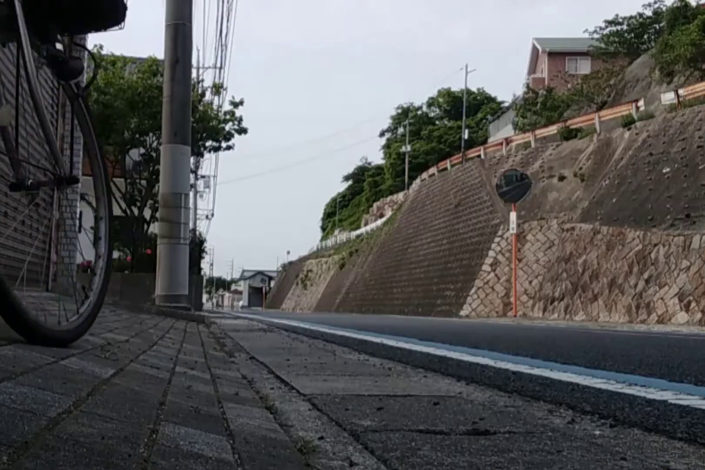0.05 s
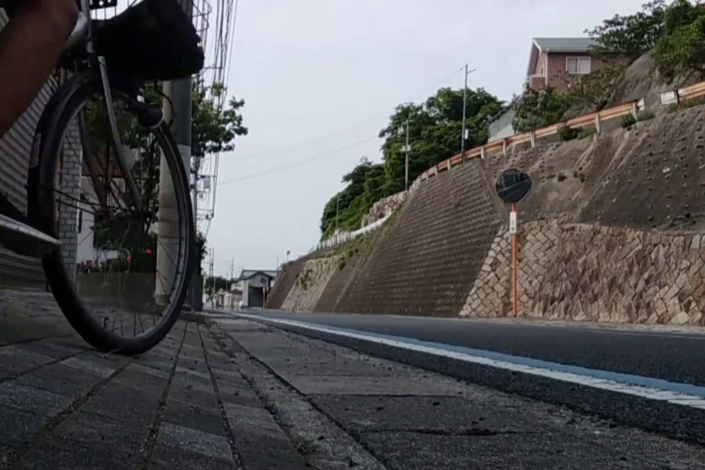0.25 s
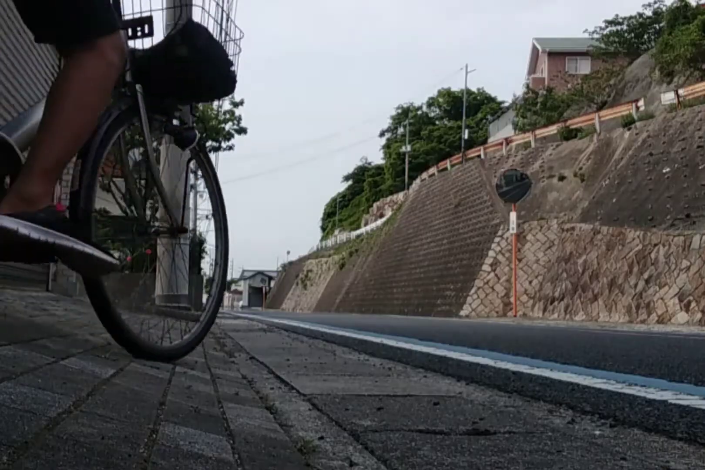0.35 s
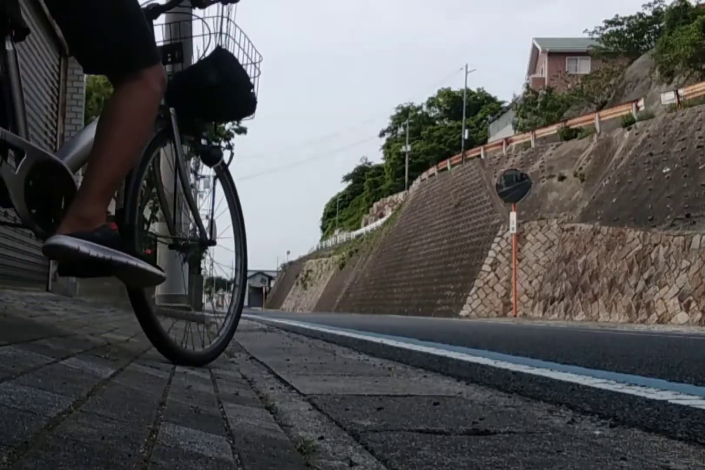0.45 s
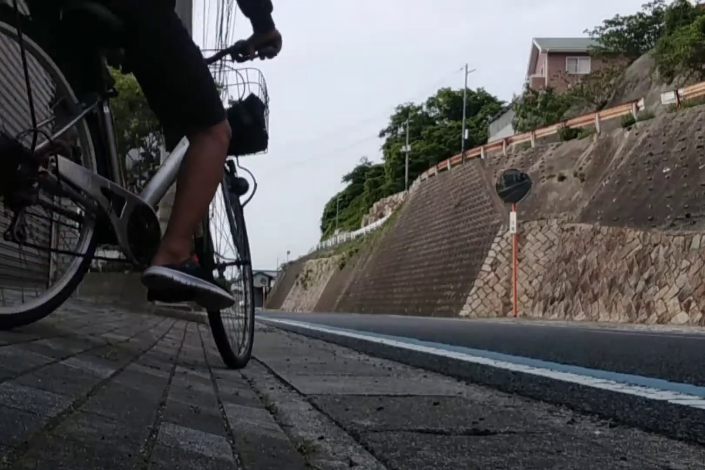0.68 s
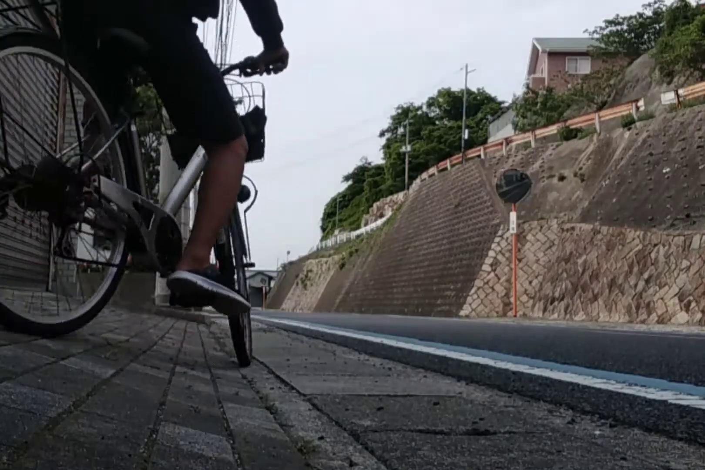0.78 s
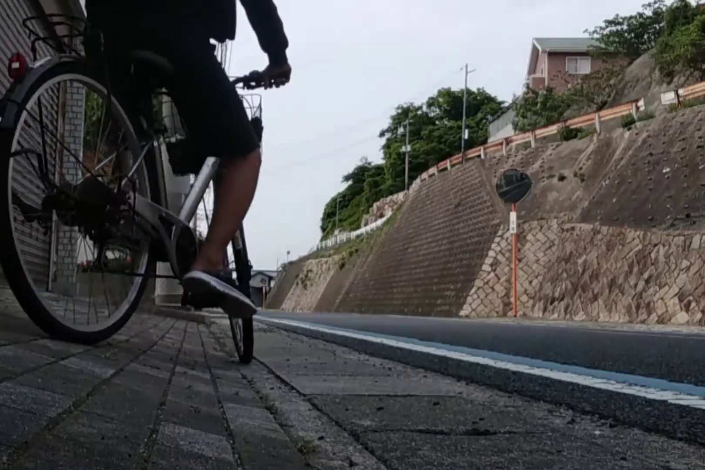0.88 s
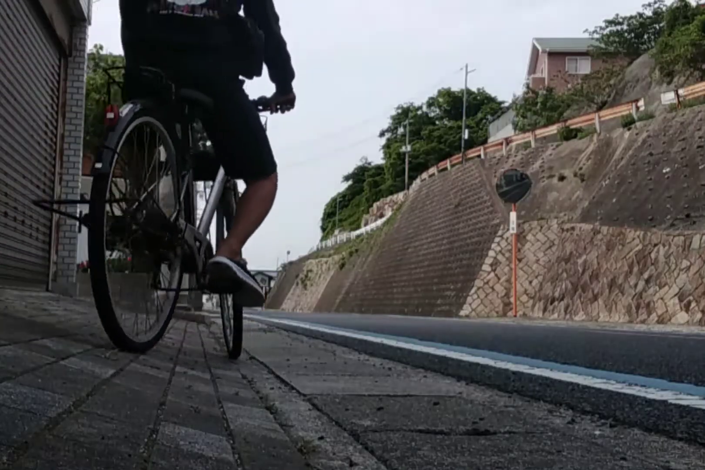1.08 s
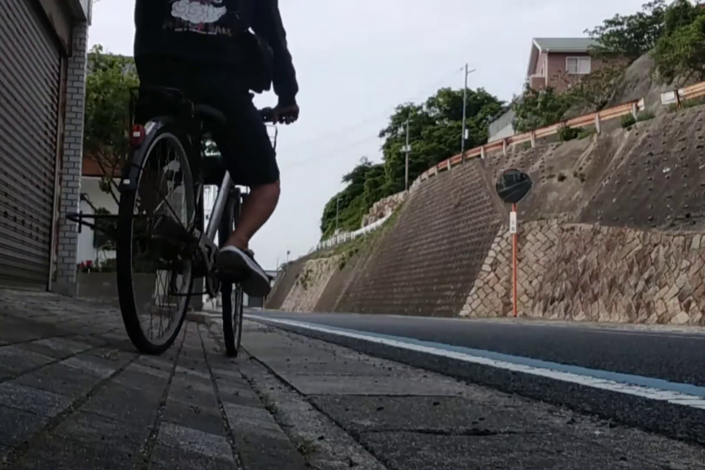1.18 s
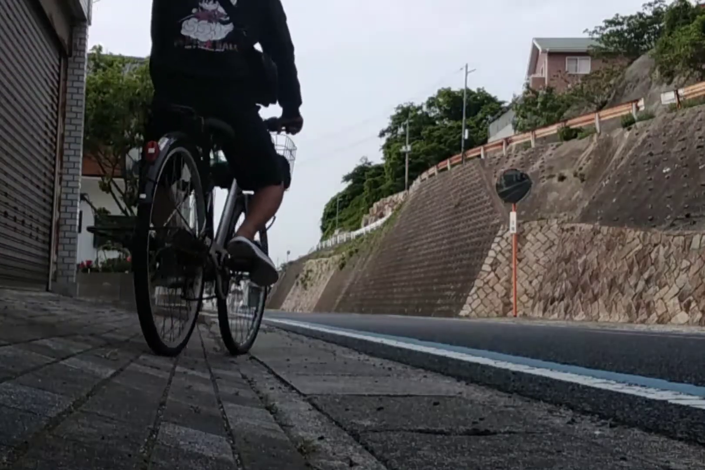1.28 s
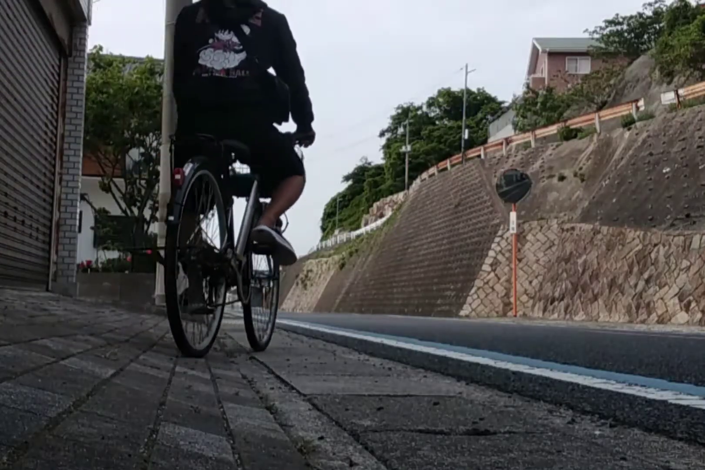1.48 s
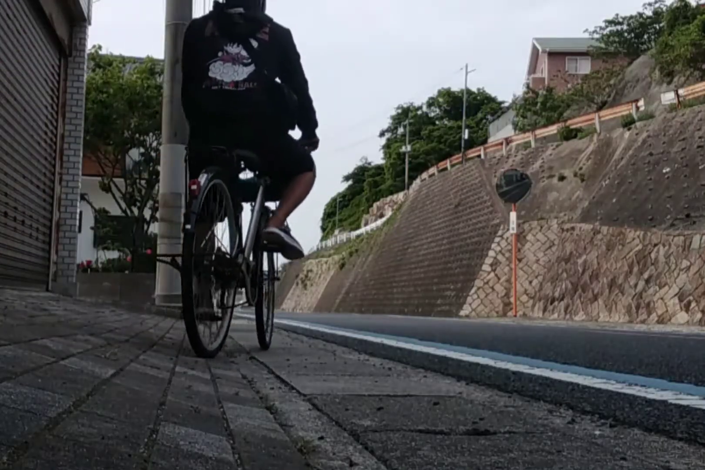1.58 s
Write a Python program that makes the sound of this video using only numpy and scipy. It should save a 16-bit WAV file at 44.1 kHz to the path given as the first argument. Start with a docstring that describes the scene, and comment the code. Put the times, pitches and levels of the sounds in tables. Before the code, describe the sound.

A bicycle rolls past a low microphone at a paved roadside. Its tyres hum and thump over joints while the freewheel ticks. It squeaks twice, then rattles once as it rides away over faint, distant traffic rumble.

```python
"""A paved roadside, heard from low down: a bicycle rolls past and rides away.
Its tyres hum on the grainy paving, thump over joints and snap grit. The freewheel pawl ticks,
a rubbing part squeaks twice, and loose metal rattles once further off.
Walls ahead return a faint tail. Distant traffic and air rumble underneath."""
import sys
import numpy as np
from scipy import signal
from scipy.fft import rfft, irfft
from scipy.io import wavfile
from scipy.ndimage import map_coordinates

SR = 44100
rng = np.random.default_rng(int(sys.argv[2]) if len(sys.argv) > 2 else 0)


def unload_audio(sound):
    """Save the sound as a 16-bit wav file, at the path given as the first command line argument."""
    columns = np.transpose(np.atleast_2d(sound))
    # keep every value between -1 and 1, then stretch to whole-number steps
    steps = np.round(np.clip(columns, -1, 1) * 32767)
    wavfile.write(sys.argv[1], SR, steps.astype(np.int16))


N = 72765
T = np.arange(N) / SR

# Tyre level as the wheels pass. Each row: time in seconds, level in dB.
TYRE_LEVEL = [(0, -39), (.205, -45), (.23, -33), (.34, -33), (.44, -38), (.55, -34), (.66, -31.5),
              (.81, -35), (1.03, -38), (1.2, -39), (1.34, -39), (1.45, -43.5), (1.65, -50.5)]
# Tyre treble, duller from behind. Each row: time in seconds, gain in dB.
TYRE_TREBLE = [(.2, 0.5), (.75, 1.5), (1.15, -4.5), (1.65, -4.5)]
# Tyre hum and grit scrape. Each row: frequency in Hz, relative density in dB.
TYRE_SPECTRUM = [(40, -32), (110, -17), (170, -8.5), (290, -16), (420, -8), (530, -5), (612, 1.5),
                 (690, -4), (790, -9), (1120, -8.5), (1400, -13), (1750, -27.5), (2600, -35), (5000, -48.5),
                 (9000, -44.5), (16000, -57)]
SCRAPE_SPECTRUM = [(1000, -24), (2000, -0.5), (3300, -4.5), (5000, -11.5), (12000, -35.5)]
# Paving joints. Each row: start in seconds, level in dB, T60 in seconds, relative crunch in dB.
JOINT_HITS = [(0.207, -29.5, 0.038, -6), (0.225, -24, 0.059, -9.5), (0.255, -23, 0.031, -27),
              (0.282, -26, 0.07, -22.5), (0.753, -23, 0.051, -30)]
# Wheel thump and grit crunch. Each row: frequency in Hz, relative density in dB.
THUMP_SPECTRUM = [(60, -36), (170, -27), (300, -8), (450, -4.5), (570, 9.5), (800, -8), (1250, -5),
                  (1600, -20), (2800, -31.5), (5000, -50), (16000, -56)]
CRUNCH_SPECTRUM = [(600, -13), (1000, 7.5), (1350, 10), (1700, -5), (3000, -11.5), (4500, -24.5),
                   (16000, -34)]
# Pawl drops. Each row: start in seconds, relative level in dB, T60 in seconds.
PAWL_DROPS = [(.1005, -37.5, 0.019), (0.1177, -41, .015), (0.166, -32.5, 0.015), (0.2262, -33, 0.017),
              (.283, -32, .016), (.3413, -33, 0.019), (0.4044, -34.5, 0.027), (0.469, -36.5, 0.033),
              (.534, -34, 0.015), (.6032, -32.5, 0.014), (.687, -36, 0.023), (.771, -37.5, .022),
              (1.349, -38, .016)]
# Pawl click. Each row: frequency in Hz, relative density in dB.
PAWL_SPECTRUM = [(800, -12), (2300, -6), (2900, 6), (3500, -7), (4300, 4.5), (5200, -3.5), (6600, 6.5),
                 (8500, -2), (12000, -3.5), (16000, 2)]
# Touches of the rubbing part. Each row: centre in seconds, half length in seconds, level in dB.
SQUEAK_TOUCHES = [(0.43, 0.012, -54), (.477, 0.0076, -36.5), (.502, 0.0085, -23), (0.516, 0.016, -36),
                  (0.56, 0.0044, -42), (0.8435, 0.012, -17.5), (0.8664, 0.015, -16)]
# Squeak pitch, dropping as the bicycle passes. Each row: time in seconds, pitch in Hz.
SQUEAK_PITCH_HZ = [(.43, 8880), (.5, 8925), (.57, 8940), (.83, 8745), (.86, 8708), (.9, 8700)]
# Loose metal knocks. Each row: start in seconds, level in dB, relative crack in dB.
METAL_KNOCKS = [(1.2444, -49, 3.5), (1.254, -40, -8), (1.269, -37, -7), (1.2764, -33.5, -4.5),
                (1.2794, -42, 0), (1.3105, -28, -12), (1.3152, -26.5, -13.5), (1.3277, -30.5, -12)]
# Thin metal modes. Each row: frequency in Hz, relative level in dB, T60 in seconds.
METAL_MODES = [(1400, -4, 0.029), (1667, -8.5, 0.03), (1895, 0, 0.023), (2013, 1.5, 0.038),
               (2270, -1, 0.027), (3140, -2.5, 0.024), (3490, -9.5, 0.032)]
# Crack of a knock. Each row: frequency in Hz, relative density in dB.
CRACK_SPECTRUM = [(700, -15), (1500, 0), (3700, 8), (5200, 5), (6500, -9), (16000, -20)]
# Short noise swells. Each row: centre in seconds, half length in seconds, level in dB.
NOISE_SWELLS = [(0.869, 0.0092, -47.5), (1.187, 0.013, -54)]
# Swell noise. Each row: frequency in Hz, relative density in dB.
SWELL_SPECTRUM = [(1200, -10), (2000, 4), (4000, 1), (7000, -2.5), (9000, -11.5), (16000, -26)]
# Chain and grit hiss. Each row: time in seconds, level in dB.
HISS_LEVEL = [(0, -56), (.11, -50), (.19, -49.5), (.25, -51.5), (.45, -49), (.7, -62), (1, -61.5),
              (1.22, -55.5), (1.33, -43.5), (1.4, -55.5), (1.65, -60.5)]
# Hiss and grit snaps. Each row: frequency in Hz, relative density in dB.
HISS_SPECTRUM = [(250, -7), (1100, 15), (2000, 10.5), (3500, 2), (5000, -2), (6500, -2), (9000, -4),
                 (16000, -26)]
# Distant traffic and air. Each row: frequency in Hz, relative density in dB.
RUMBLE_SPECTRUM = [(15, 2.5), (30, -6.5), (70, -2.5), (150, -5), (300, -16), (600, -10), (1100, -31),
                   (2000, -31.5), (4000, -29), (8000, -35.5), (16000, -35.5)]
# Microphone housing resonances. Each row: frequency in Hz, gain in dB.
HOUSING_GAIN = [(5300, 0.5), (6300, 6.5), (6900, 6.5), (7600, -1), (12500, -0.5), (14500, 2.5), (15700, 8),
                (16100, -19)]


def amp(db):
    """Decibels to gain."""
    return 10 ** (np.asarray(db) / 20)


def unit_rms(x):
    """Scales to an rms of one."""
    return x / np.sqrt(np.mean(x ** 2) + 1e-20)


def curve(points):
    """Joins (seconds, value) points by straight lines."""
    return np.interp(T, *np.transpose(points))


def decay(t, t60_s):
    """Envelope falling 60 dB in t60_s."""
    return np.exp(-np.log(1000) * t / t60_s)


def add(mix, start_s, sound):
    """Mixes a sound in at start_s."""
    part = mix[max(round(start_s * SR), 0):][:len(sound)]
    part += sound[:len(part)]


def response(spectrum, size=4096):
    """Minimum-phase impulse response from (Hz, dB) points."""
    hz, db = np.transpose(spectrum)
    bins_hz = abs(np.fft.fftfreq(size, 1 / SR))
    log_gain = np.log(amp(np.interp(np.log(bins_hz + 1), np.log(hz), db)))
    return np.fft.ifft(np.exp(np.conj(signal.hilbert(log_gain)))).real[:size // 2]


def colour(x, spectrum):
    """Gives white excitation a spectrum and keeps its power."""
    impulse = response(spectrum)
    return signal.fftconvolve(x, impulse / np.linalg.norm(impulse))[:N]


def drift(rate_hz):
    """Random drift up to about rate_hz, rms one."""
    lowpass = np.exp(-(np.fft.rfftfreq(N, 1 / SR) / rate_hz) ** 2)
    return unit_rms(irfft(rfft(rng.standard_normal(N)) * lowpass, N))


def grains(per_s, spread_db):
    """Random tiny impacts of uneven size, rms one."""
    size = amp(spread_db * np.minimum(rng.exponential(1, N), 4))
    return unit_rms(size * rng.choice([-1, 1], N) * (rng.random(N) < per_s / SR))


def burst(t60_s):
    """A scatter of contacts that dies away."""
    t = T[:SR // 4]
    return rng.choice([-1, 1], len(t)) * decay(t, t60_s)


def tyres(scrape_db=-26.5, corner_hz=925):
    """Paving grains drum on the tyres and grit scrapes under them; both dull as the bicycle leaves."""
    hum = colour(grains(per_s=3500, spread_db=2.5), TYRE_SPECTRUM)
    scrape = colour(grains(per_s=900, spread_db=2.5), SCRAPE_SPECTRUM)
    rolling = hum + amp(scrape_db) * scrape
    low = signal.sosfiltfilt(signal.butter(3, corner_hz, fs=SR, output="sos"), rolling)
    treble = (rolling - low) * amp(curve(TYRE_TREBLE))
    return (low + treble) * amp(curve(TYRE_LEVEL))


def paving_joints():
    """Joints thump the wheels, which crunch the grit lying in them."""
    blows, crunch = np.zeros(N), np.zeros(N)
    for start_s, db, t60_s, crunch_db in JOINT_HITS:
        add(blows, start_s, amp(db) * burst(t60_s))
        add(crunch, start_s, amp(db + crunch_db) * burst(t60_s=0.21))
    return colour(blows, THUMP_SPECTRUM) + colour(crunch, CRUNCH_SPECTRUM)


def freewheel(ring_db=-17, ring_t60_s=0.15, bounce_s=0.0034, bounce_db=-6, gain_db=-2):
    """The pawl drops on each tooth, bounces once and leaves a short ring in the hub."""
    clicks = np.zeros(N)
    for start_s, db, t60_s in PAWL_DROPS:
        add(clicks, start_s, amp(db) * (burst(t60_s) + amp(ring_db) * burst(ring_t60_s)))
        add(clicks, start_s + bounce_s, amp(db + bounce_db) * burst(t60_s))
    return amp(gain_db) * colour(clicks, PAWL_SPECTRUM)


def squeaks(ring_db=-33, ring_t60_s=0.63, waver_hz=6):
    """A rubbing part sings in one high mode, swelling with each touch and ringing on faintly."""
    touches = sum(amp(db) / np.cosh(np.clip((T - centre_s) / half_s, -20, 20)) ** 2
                  for centre_s, half_s, db in SQUEAK_TOUCHES)
    fade = decay(T, ring_t60_s)
    ring = np.maximum.accumulate(touches / fade) * fade  # decaying peak hold
    pitch_hz = curve(SQUEAK_PITCH_HZ) + waver_hz * drift(rate_hz=80)
    return (touches + amp(ring_db) * ring) * np.sin(2 * np.pi * np.cumsum(pitch_hz) / SR)


def rattle(ring_db=-8):
    """Loose thin metal knocks: a brief crack and a modal ring each time."""
    rings, cracks = np.zeros(N), np.zeros(N)
    t = T[:SR // 4]
    for start_s, db, crack_db in METAL_KNOCKS:
        ring = sum(amp(mode_db) * decay(t, t60_s) * np.sin(2 * np.pi * (hz * t + rng.random()))
                   for hz, mode_db, t60_s in METAL_MODES)
        add(rings, start_s, amp(db + ring_db) * ring)
        add(cracks, start_s, amp(db + crack_db) * burst(t60_s=0.015))
    return rings + colour(cracks, CRACK_SPECTRUM)


def noise_swells():
    """A brief broadband rasp at the loudest squeak's peak, and a faint scuff later."""
    swells = sum(amp(db) * np.exp(-((T - centre_s) / half_s) ** 2)
                 for centre_s, half_s, db in NOISE_SWELLS)
    return swells * colour(rng.standard_normal(N), SWELL_SPECTRUM)


def chain_hiss():
    """Fine crackle of the chain and of grit under the tread."""
    return colour(grains(per_s=5000, spread_db=3.6), HISS_SPECTRUM) * amp(curve(HISS_LEVEL))


def grit_snaps(per_s=32, gain_db=-45.5):
    """Single bits of grit snap under the tread."""
    impulses = (rng.random(N) < per_s / SR) * rng.uniform(0.34, 1, N)
    snaps = signal.fftconvolve(impulses, burst(t60_s=0.011))[:N]
    return amp(gain_db) * colour(snaps, HISS_SPECTRUM)


def wall_reflections(bicycle, doppler_ratio=1.003, delay_s=0.012, t60_s=0.5, gain_db=-29):
    """Walls ahead of the moving bicycle return a faint tail, slightly sharp."""
    t = T[:SR]
    tail = rng.standard_normal(len(t)) * decay(t, t60_s) * (t > delay_s)
    shifted = map_coordinates(bicycle, [np.arange(N) * doppler_ratio])
    return amp(gain_db) * signal.fftconvolve(shifted, tail / np.linalg.norm(tail))[:N]


def rumble(level_db=-49.5):
    """Distant traffic and air: steady low noise."""
    return amp(level_db) * colour(rng.standard_normal(N), RUMBLE_SPECTRUM)


def scene():
    """Bicycle, reflections and rumble, mono."""
    bicycle = tyres() + paving_joints() + freewheel() + squeaks() + rattle()
    bicycle += noise_swells() + chain_hiss() + grit_snaps()
    return (bicycle + wall_reflections(bicycle) + rumble())[None]


def record(dry):
    """The microphone housing colours the treble; a low-pass limits the band."""
    coloured = signal.fftconvolve(dry, response(HOUSING_GAIN)[None])[:, :N]
    cutoff_hz = 16500
    lowpass = signal.firwin(161, cutoff_hz, window=("kaiser", 9), fs=SR)
    return signal.oaconvolve(coloured, lowpass[None], "same")


dry = scene()
out = record(dry)
unload_audio(out)
```